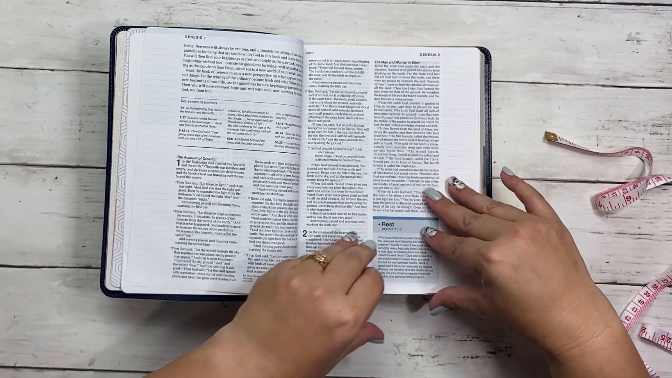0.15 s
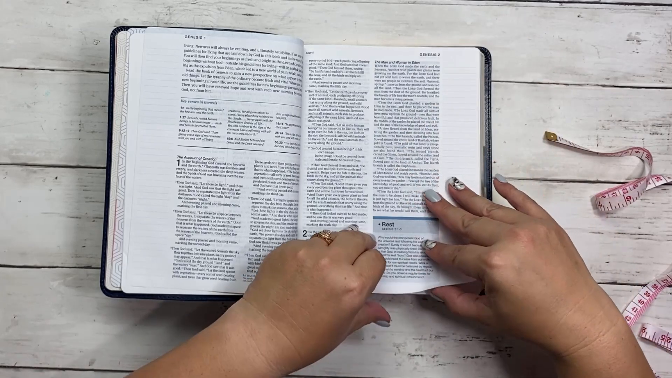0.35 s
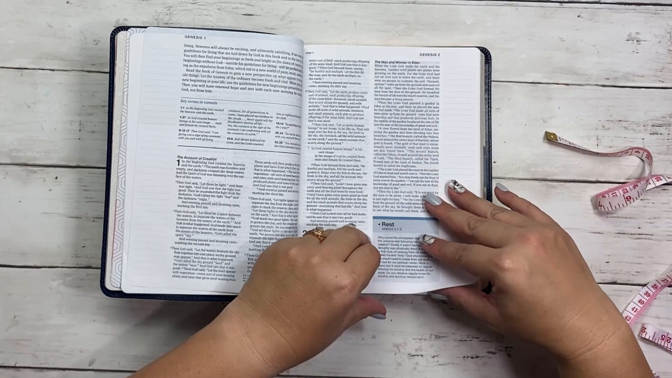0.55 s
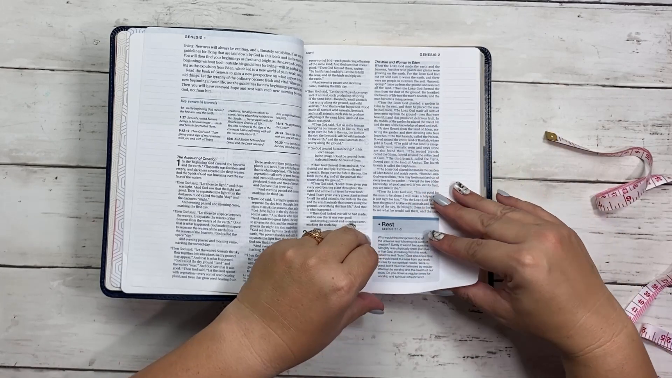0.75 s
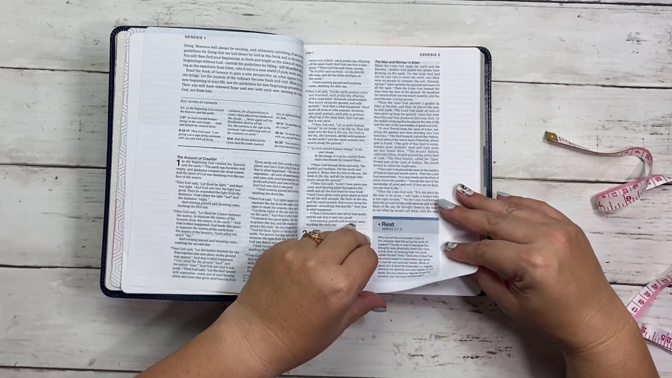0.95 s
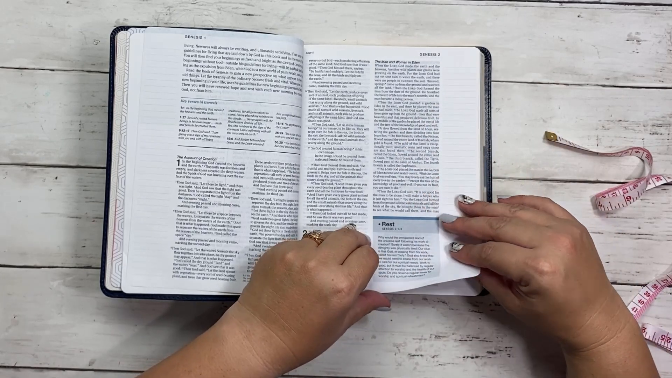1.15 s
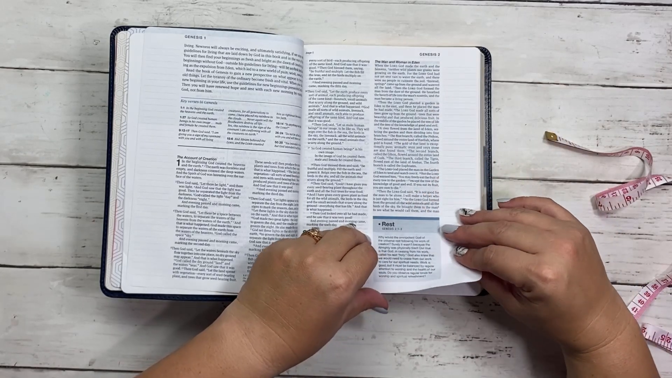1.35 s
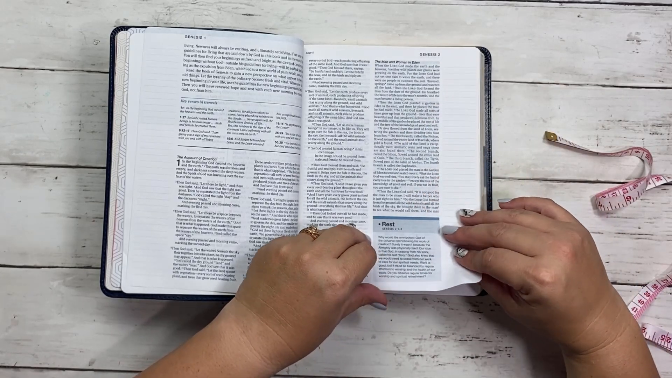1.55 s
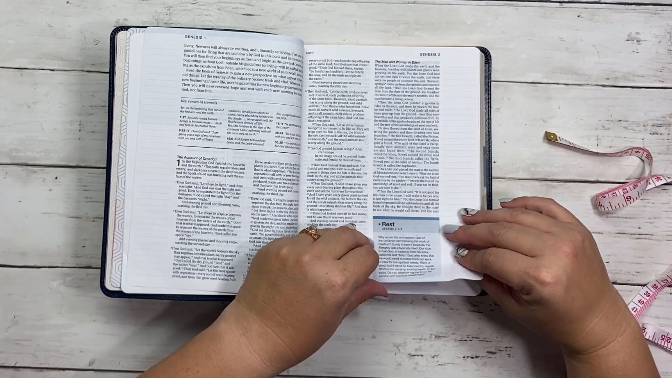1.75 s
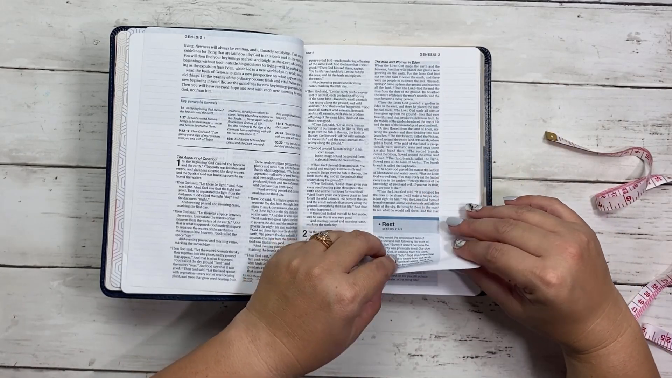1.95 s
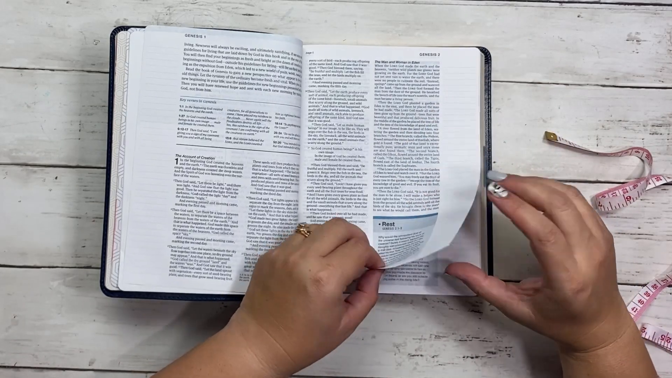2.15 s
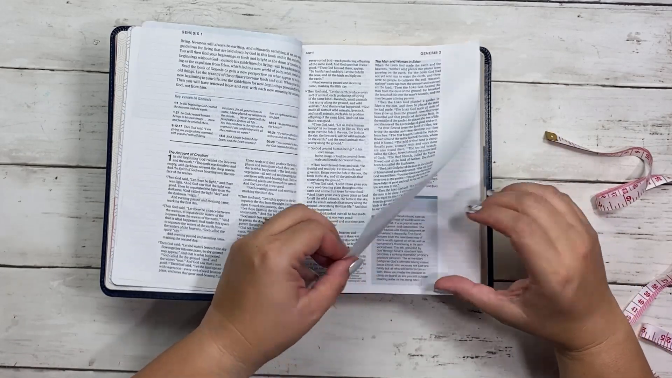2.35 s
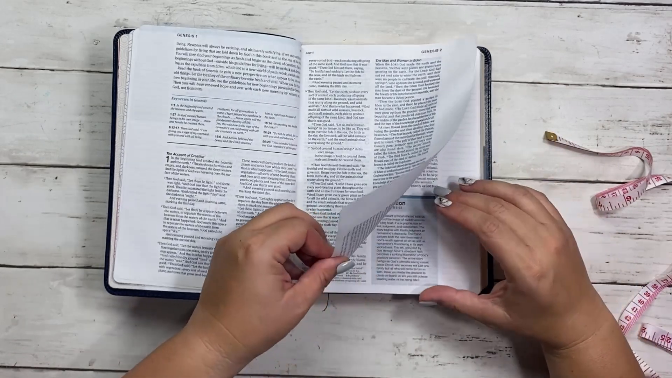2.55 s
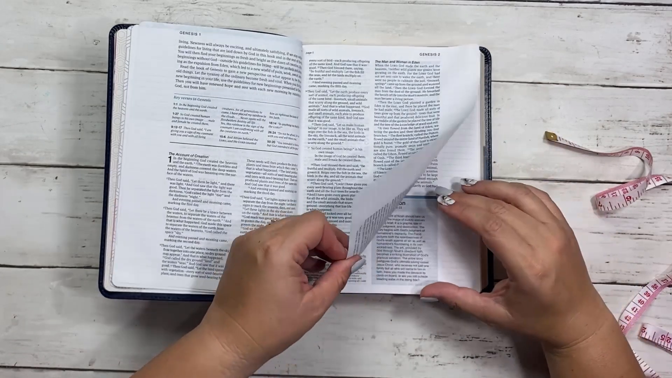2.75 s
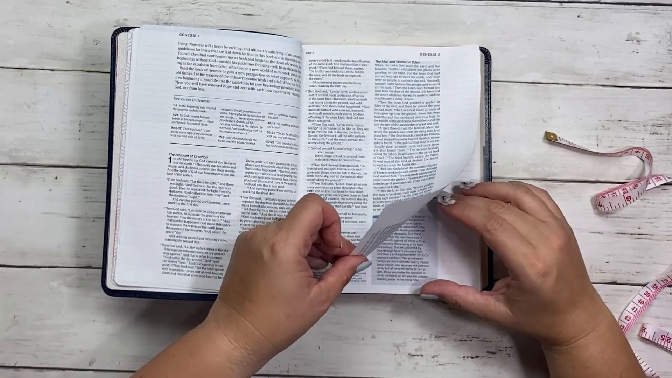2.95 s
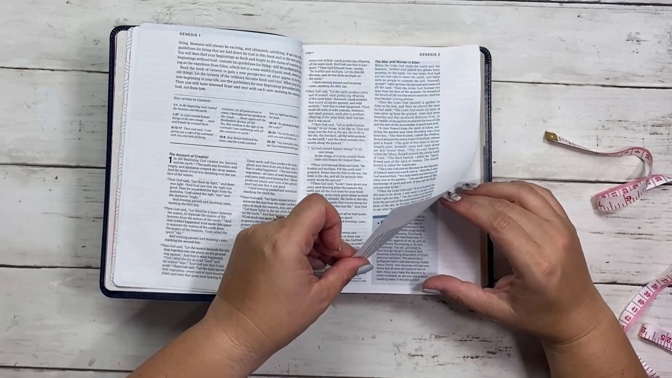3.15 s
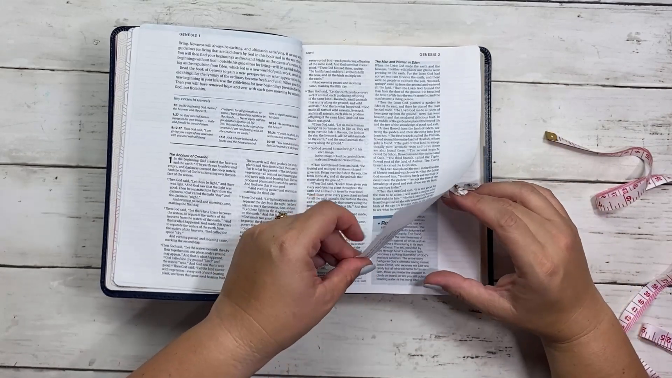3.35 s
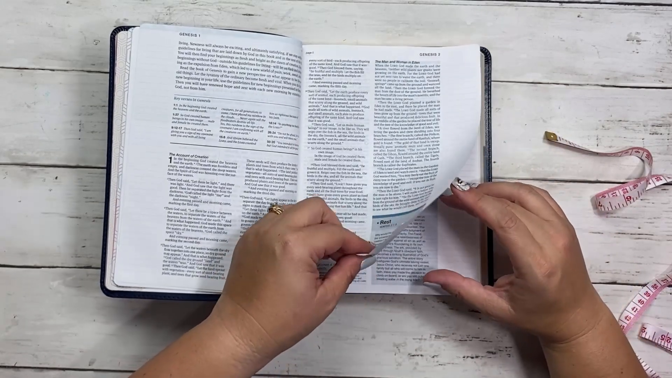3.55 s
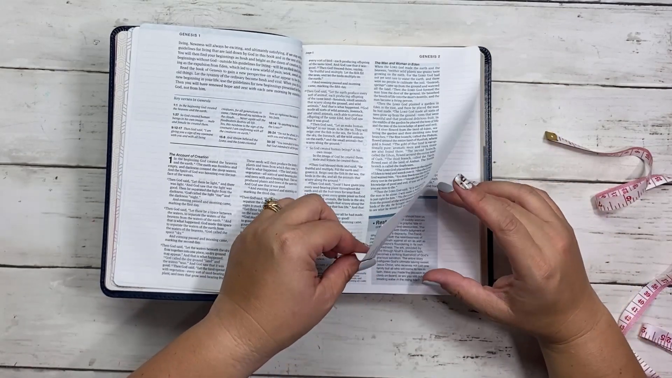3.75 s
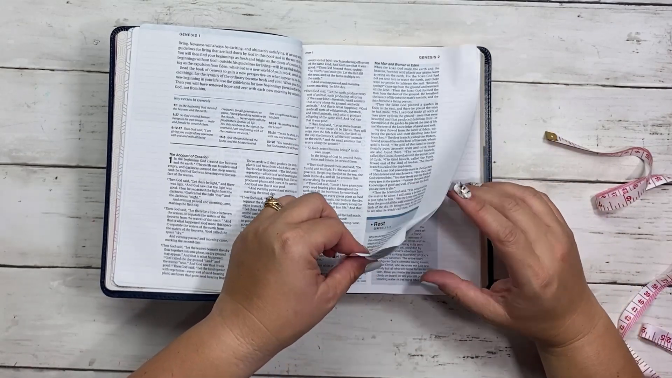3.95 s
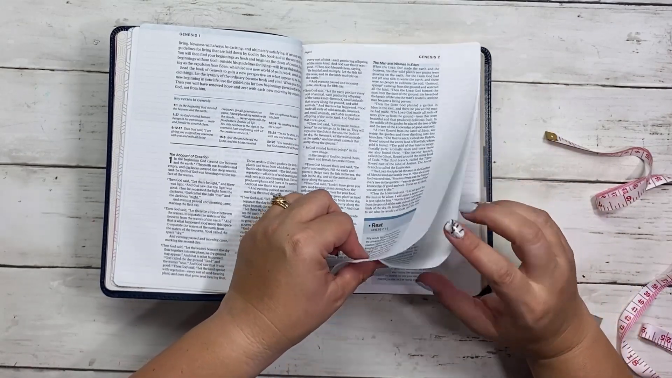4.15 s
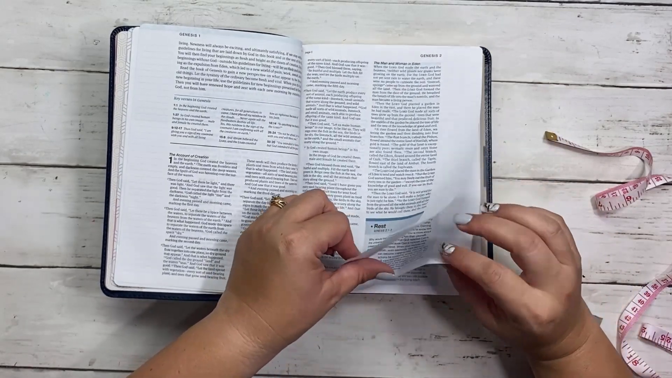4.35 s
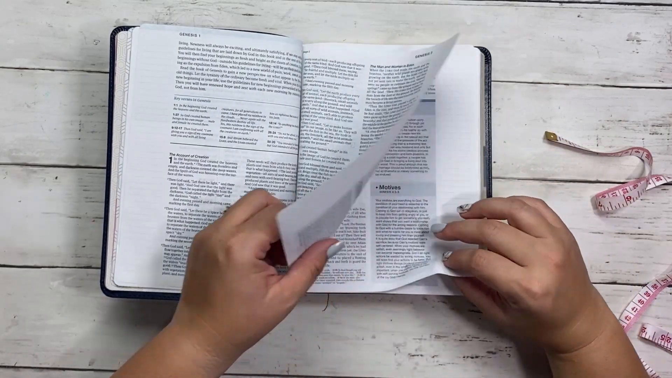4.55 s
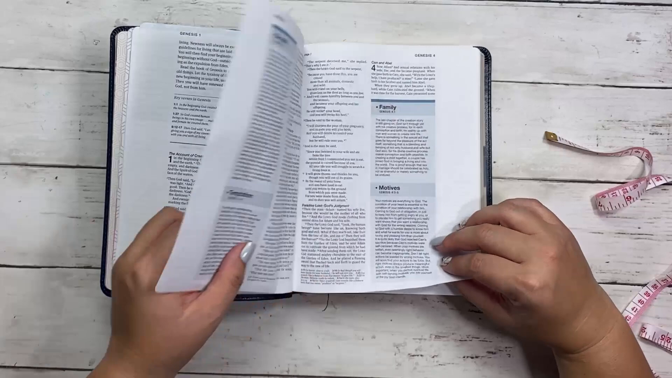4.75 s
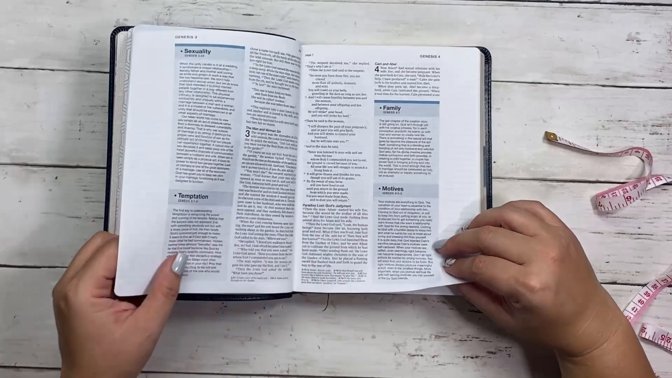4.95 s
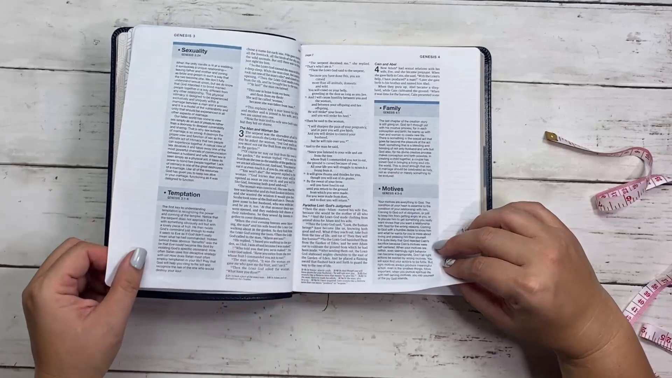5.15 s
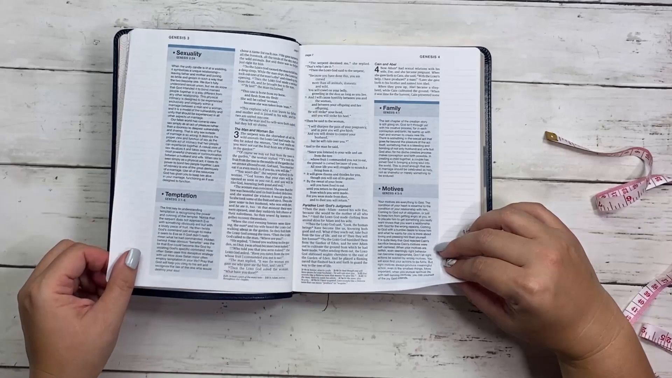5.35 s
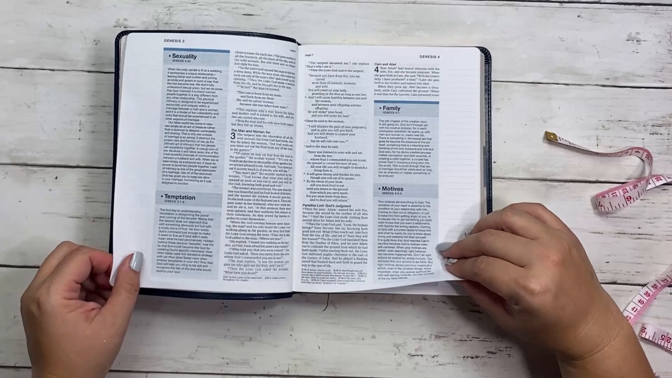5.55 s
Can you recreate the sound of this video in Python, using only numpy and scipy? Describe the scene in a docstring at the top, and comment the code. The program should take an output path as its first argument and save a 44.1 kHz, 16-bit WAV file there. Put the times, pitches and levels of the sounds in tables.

```python
"""Wooden table in a quiet room: hands smooth, lift and turn the thin pages of a book.
Fingers rub the paper (banded noise), the lifted sheet flutters (duller noise) and crinkles (short rings).
Creases snap or fingernails tap with a tick and a short pop, wrists bump the table (thuds falling in pitch);
something hard clinks once (decaying modes); a low rumble of the house lies below (noise near 60 Hz).
Two close microphone ports hear it."""
import sys
import numpy as np
from scipy import signal
from scipy.fft import rfft, irfft, next_fast_len
from scipy.io import wavfile
from scipy.ndimage import uniform_filter1d

SR = 44100
rng = np.random.default_rng(int(sys.argv[2]) if len(sys.argv) > 2 else 0)


def waveform_to_disk(signal):
    """Save audio, clipped to [-1, 1], as 16-bit WAV at the path in sys.argv[1]."""
    frames = np.transpose(np.atleast_2d(signal))
    scaled = np.clip(frames, -1, 1) * 32767
    samples = np.round(scaled).astype(np.int16)
    wavfile.write(sys.argv[1], SR, samples)


N = 250929

# rustles of hand-moved paper: peak_s, rise_s and fall_s (over 20 dB),
# rubbing_db, sizzle_db, flutter_db (of the lifted sheet)
RUSTLES = [(0.01, .05, .3, -73, -65, -73), (0.175, .04, .07, -66, -65, -72),
           (0.33, .02, .15, -60, -56, -79), (0.367, .05, .11, -50, -50, -57), (.44, .1, .04, -63, -61, -65),
           (0.529, .04, .26, -55.5, -66, -72), (.7, .4, .4, -78, -66, -90), (0.95, .25, .2, -62, -58, -76),
           (1.04, .2, .05, -56, -61, -75), (1.135, .035, .17, -51, -61, -66),
           (1.295, .14, .07, -48, -66, -67), (1.39, .04, .08, -56, -72, -58), (1.5, .1, .25, -72, -84, -72),
           (1.754, .15, .1, -74, -84, -78), (1.86, .02, .15, -76, -73, -74),
           (1.94, .08, .2, -57.5, -64, -57), (2.041, .04, .15, -56, -70, -53),
           (2.11, .03, .2, -49, -54, -60), (2.14, .03, .16, -45, -44, -48), (2.22, .15, .05, -60, -60, -52),
           (2.337, .04, .2, -54, -63, -49), (2.41, .1, .1, -62, -62, -49), (2.5, .15, .15, -56, -62, -53),
           (2.59, .2, .05, -56, -69, -64), (2.752, .025, .15, -54.5, -62, -45),
           (2.85, .09, .1, -46, -51, -50), (3.155, .015, .1, -56, -57, -50),
           (3.365, .03, .1, -62, -80, -85), (3.408, .03, .1, -45, -57, -48),
           (3.545, .02, .05, -36, -46, -43), (3.6, .06, .2, -46, -51, -49),
           (3.722, .04, .11, -43, -50, -49), (3.831, .04, .2, -47, -53, -47),
           (3.927, .07, .15, -39, -42, -48), (4.075, .02, .06, -40, -45, -52),
           (4.095, .03, .12, -36, -46, -48), (4.155, .08, .06, -39, -44, -50),
           (4.22, .06, .2, -43, -54, -54), (4.34, .1, .15, -44, -54, -56), (4.39, .1, .05, -40, -54, -57),
           (4.48, .1, .05, -50, -58, -62), (4.525, .015, .07, -46, -50, -55), (4.62, .2, .3, -56, -56, -65),
           (4.75, .1, .2, -54, -55, -55), (4.849, .1, .1, -39, -53, -50), (4.95, .3, .3, -62, -57, -64),
           (5.059, .06, .2, -47, -52, -65), (5.16, .25, .15, -48, -55, -72),
           (5.31, .5, .025, -49, -53, -74), (5.37, .1, .25, -71, -68, -85),
           (5.568, .02, .09, -58, -63, -54)]


def amp(db):
    """dB to gain."""
    return 10 ** (np.asarray(db) / 20)


def rms_one(x):
    """Scale to rms 1."""
    return x / np.sqrt(np.mean(x ** 2) + 1e-20)


def in_time(curve):
    """Read a (time in s, value) curve at every sample."""
    s, values = np.transpose(curve)
    return np.interp(np.arange(N) / SR, s, values)


def at_hz(points, hz):
    """Read a spectrum on a log frequency axis."""
    p = np.array(points)
    return np.interp(np.log(hz + 1), np.log(p[:, 0] + 1), p[:, 1])


def drift(corner_hz):
    """Slow random curve of spread 1: noise through two equal one-pole low-passes."""
    step = 40   # samples between drawn points
    r = np.exp(-2 * np.pi * corner_hz * step / SR)
    white = rng.standard_normal(N // step + 2002)
    slow = signal.lfilter([1], [1, -2 * r, r * r], white)[2000:]   # drop the run-in
    return np.interp(np.arange(N) / step, np.arange(len(slow)), rms_one(slow))


def coloured(x, spectrum):
    """Give white signals a spectrum; rms 1."""
    size = next_fast_len(N)
    gain = amp(at_hz(spectrum, np.fft.rfftfreq(size, 1 / SR)))
    return rms_one(irfft(rfft(x, size) * gain, size)[..., :N])


def wide_noise(spectrum):
    """Stereo noise whose two sides agree less or more by band; rms 1."""
    # left-right correlation: freq_hz, likeness (0 to 1)
    likeness = [(30, .85), (60, 1), (300, 0.3), (1400, 0.4), (5000, 0.47), (12000, 1)]
    size = next_fast_len(N)
    alike = np.clip(at_hz(likeness, np.fft.rfftfreq(size, 1 / SR)), 0, 1)
    mid, side = rfft(rng.standard_normal((2, size)))
    pair = irfft(np.sqrt(1 + alike) * mid + np.sqrt(1 - alike) * side * [[1], [-1]], size)
    return coloured(pair[:, :N], spectrum)


def ring(clicks, hz, cycles):
    """A click sets a sine of height 1 ringing that falls 60 dB in so many cycles."""
    r = amp(-60 * hz / (cycles * SR))
    w = 2 * np.pi * hz / SR
    return signal.lfilter([0, np.sin(w)], [1, -2 * r * np.cos(w), r * r], clicks + 1e-18)


def hush():
    """Steady faint noise of the quiet room."""
    # freq_hz, level_db (per Hz, relative)
    hush_spectrum = [(60, -21.5), (120, -0.5), (200, 2.5), (400, -4.5), (800, -10.5), (2000, -18),
                     (4500, -15.5), (8000, -29), (13000, -28), (16500, -35)]
    level_db = -70
    return amp(level_db) * wide_noise(hush_spectrum)


def house_rumble():
    """Low noise of the house, narrow around 60 Hz, at a drawn level."""
    # start_s, level_db
    level_curve = [(0.0, -62), (0.06, -56), (0.11, -67), (0.28, -51), (1.66, -62), (1.7, -52), (1.92, -60),
                   (2.84, -55), (3.1, -66), (3.15, -56), (3.31, -70), (3.49, -58), (3.6, -70), (3.66, -56),
                   (3.88, -50), (3.93, -66), (4.72, -63), (4.86, -53), (4.93, -64), (5.03, -58), (5.2, -66),
                   (5.24, -55), (5.33, -51), (5.36, -66), (5.67, -57), (5.69, -66)]
    # freq_hz, level_db (per Hz, relative)
    rumble_spectrum = [(15, -52), (30, -19.5), (45, -11.5), (59, 5.5), (72, -4.5), (110, -6.5), (160, -17),
                       (300, -53)]
    return amp(in_time(level_curve)) * wide_noise(rumble_spectrum)


def room(x):
    """Eight feedback delays a side, duller on every round."""
    bass_t60_s, wall_cut_hz, level_db = .3, 13000, -17
    out = np.zeros((2, N))
    dull = np.exp(-2 * np.pi * wall_cut_hz / SR)
    lags = (rng.uniform(.007, 0.027, 16) * SR).astype(int)
    for k, lag in enumerate(lags):
        loop, state = x.copy(), [0.]
        gain = amp(-60 * lag / SR / bass_t60_s)
        for i in range(lag, N, lag):
            back, state = signal.lfilter([gain * (1 - dull)], [1, -dull], loop[i - lag:i], zi=state)
            loop[i:i + lag] += back[:N - i]
        echoes = loop - x
        out[k % 2] += echoes * (-1) ** (k // 2)
    return amp(level_db) * out


def clink():
    """One light touch of something small and hard sets a few clear modes going."""
    # freq_hz, level_db (under the touch), t60_s
    clink_modes = [(1400, -20, .012), (2500, -2, .03), (2570, -7, .05), (4500, -10, .016),
                   (11230, -5, .025)]
    start_s, touch_db, touch_cut_hz = 1.8455, -44, 5000
    touch = np.zeros(N)
    touch[round(start_s * SR)] = amp(touch_db)
    touch = signal.lfilter(*signal.butter(1, touch_cut_hz, fs=SR), touch)
    return sum(amp(db) * ring(touch, hz, hz * t60_s) for hz, db, t60_s in clink_modes)


def bumps():
    """Soft flesh on wood: bending waves arrive high ones first, so the thud falls; the page block shuffles."""
    # wrists and fingertips on the table: start_s, level_db, first_hz, last_hz, t60_s
    table_bumps = [(.17, -58, 300, 150, .2), (0.374, -46.5, 497, 126, 0.22), (0.651, -42, 380, 170, 0.1),
                   (0.912, -40, 590, 95, 0.21), (0.949, -53, 706, 300, .03), (1.373, -38, 500, 184, 0.09),
                   (1.536, -47, 464, 198, 0.034), (2.47, -52, 350, 190, .2), (2.8, -50, 350, 180, .2),
                   (5.186, -61, 610, 400, 0.089)]
    shuffle_spectrum = [(60, -30), (130, 4), (400, -0.5), (700, -16.5), (2000, -55)]   # Hz, dB per Hz
    glide_s, attack_s, shuffle_db, shuffle_t60_s = 0.00413, .0026, -13, 0.24
    out, t = np.zeros(N), np.arange(N) / SR
    shuffle = coloured(rng.standard_normal(N), shuffle_spectrum)
    for start_s, level_db, first_hz, last_hz, t60_s in table_bumps:
        age = np.clip(t - start_s, 0, None)
        hz = last_hz + (first_hz - last_hz) * np.exp(-age / glide_s)
        phase = 2 * np.pi * np.cumsum(hz * (age > 0)) / SR
        thud = amp(-60 * age / t60_s) * np.sin(phase)
        pages = amp(shuffle_db - 60 * age / shuffle_t60_s) * shuffle
        out += amp(level_db) * (1 - np.exp(-age / attack_s)) * (thud + pages)
    return out


def sheet_ring(x):
    """Whatever shakes the lifted sheet rings on faintly and briefly in its modes."""
    # freq_hz, level_db (relative, before the hz / SR factor), t60_s
    sheet_modes = [(790, -22, .05), (915, -18, .06), (1082, -18, .06), (1380, -24, .04), (1670, -24, .03),
                   (2150, -20, .04), (4600, -24, .02)]
    return sum(amp(db) * hz / SR * ring(x, hz, hz * t60_s) for hz, db, t60_s in sheet_modes)


def snaps_and_taps():
    """A crease snaps or a fingernail taps: treble tick first, then a short pop; one tick rings long."""
    # start_s, pop_hz, pop_db, tick_hz, tick_db, tick_ring_cycles, sizzle_db
    ticks_and_pops = [(0.364, 1040, -53, 2420, -46, 5.5, -35), (0.5146, 1360, -61, 5840, -50.5, 3.8, -45),
                      (1.334, 597, -51, 4400, -42, 15, -64), (1.3564, 620, -55, 3560, -47, 15, -58),
                      (1.3623, 860, -55, 4400, -43, 14, -61), (1.3719, 570, -42, 1450, -51, 150, -64),
                      (1.3998, 765, -50, 4010, -42, 15, -59), (1.4049, 690, -49, 3880, -44, 9.3, -62),
                      (1.4086, 595, -48, 3920, -47, 9.3, -60), (1.4826, 980, -56, 3900, -48.5, 15, -71),
                      (1.5332, 1730, -69, 3210, -47, 7, -76), (1.7355, 950, -67, 3810, -56.5, 15, -79),
                      (1.8918, 670, -50, 4570, -60, 7.4, -69), (1.9119, 775, -44.5, 2150, -50, 4.4, -62),
                      (1.9334, 970, -40, 4530, -43, 15, -70), (1.9642, 660, -42, 3260, -47.5, 6.3, -55),
                      (2.0245, 830, -37, 2760, -53, 5, -73), (2.0334, 740, -24, 5550, -34.5, 5.9, -75),
                      (2.1286, 925, -19.5, 6440, -14.5, 2.6, -66),
                      (2.1318, 890, -35, 6780, -54.5, 5, -24.5), (2.235, 860, -40.5, 6270, -49, 5, -48),
                      (2.3292, 854, -41.5, 2390, -39.5, 3.5, -66), (2.4424, 820, -35, 6680, -47, 6.1, -61),
                      (2.4564, 930, -36, 6930, -68, 5, -64), (2.4614, 1030, -29.5, 6340, -45, 6.8, -47),
                      (2.4935, 1040, -19, 2270, -38.5, 1.7, -46),
                      (2.5276, 1680, -51, 4090, -39.5, 6.7, -55), (2.578, 1020, -28.5, 1860, -39.5, 8, -62),
                      (2.7382, 886, -14.5, 2200, -35, 4.2, -55), (2.77, 1000, -16, 2180, -36.5, 2.3, -31),
                      (2.8156, 1100, -21, 2160, -37, 4.3, -54), (2.823, 1460, -30, 6660, -28.5, 8.8, -28.5),
                      (2.868, 1160, -26, 1920, -36, 3.8, -49), (2.8753, 1780, -30, 1840, -30, 6, -48.5),
                      (3.1434, 930, -22, 2450, -34, 5.2, -48), (3.3848, 1180, -41, 4670, -37, 4.1, -44),
                      (3.4106, 925, -22.5, 2100, -29.5, 4.5, -36), (3.45, 830, -34, 4100, -40, 3.4, -57),
                      (3.4854, 780, -40, 2390, -45, 5, -57), (3.5052, 1070, -30, 1900, -38, 4.4, -52),
                      (3.519, 1500, -36, 2200, -38, 5, -55), (3.5345, 2000, -30, 3500, -24, 2, -30),
                      (3.5385, 2150, -28, 6560, -22, 2, -29), (3.5525, 1110, -28.5, 2760, -24, 1.7, -35),
                      (3.5575, 1010, -25, 2060, -27, 5, -56), (3.6294, 1020, -31, 2560, -38, 4.5, -46),
                      (3.647, 1100, -48, 4000, -40, 4, -42), (3.6576, 1050, -44, 2750, -36, 3.1, -36),
                      (3.696, 1200, -52, 4500, -43, 2, -45), (3.7058, 1080, -32, 6700, -28.5, 7.4, -41),
                      (3.712, 1000, -32, 4500, -40, 4, -50), (3.716, 1460, -33, 1950, -25, 2.5, -23),
                      (3.7252, 980, -27.5, 3060, -30, 3.3, -43), (3.738, 1100, -42, 6000, -32, 3, -38),
                      (3.76, 1800, -45, 2500, -38, 5, -55), (3.77, 1790, -54, 2970, -33.5, 2.6, -43),
                      (3.782, 1700, -48, 3040, -36, 3.5, -31), (3.8185, 1170, -25, 3900, -23, 4.4, -36),
                      (3.8385, 1010, -28.5, 1940, -30, 9.7, -47), (3.8928, 1160, -44, 4600, -31, 15, -43),
                      (3.909, 1800, -42, 2500, -35, 4, -50), (3.914, 950, -26, 4100, -24.5, 2.7, -21),
                      (3.9327, 1120, -48, 2940, -30, 4.1, -32), (3.9728, 1440, -39, 6600, -28.5, 3.3, -31),
                      (4.0088, 1770, -47, 2280, -35, 3.4, -29), (4.0405, 1250, -62, 2590, -37, 6.4, -30),
                      (4.0476, 780, -63, 3040, -33.5, 5.5, -27),
                      (4.0703, 1750, -38, 3680, -27.5, 4.2, -19.5), (4.077, 1800, -46, 2730, -29, 6, -38),
                      (4.094, 1000, -40, 2500, -33, 5, -38), (4.137, 1500, -48, 7000, -31, 6, -36),
                      (4.1418, 1770, -55, 2150, -28, 8.9, -27), (4.199, 1500, -50, 3500, -36, 3, -45),
                      (4.2078, 1100, -38, 2400, -30, 5, -46), (4.2654, 860, -35, 2130, -36, 2.9, -50),
                      (4.3048, 1200, -38, 1950, -36, 3.1, -54), (4.3329, 1820, -45, 4180, -32, 3.1, -53),
                      (4.3719, 790, -40.5, 2830, -32.5, 5, -31), (4.449, 1790, -47, 4900, -43, 5, -54),
                      (4.5027, 1860, -43, 2250, -36, 3.3, -36), (4.5155, 1490, -27, 2900, -25, 7, -18),
                      (4.525, 1200, -40, 3500, -35, 3, -35), (4.586, 1800, -55, 2700, -44, 8, -65),
                      (4.639, 1500, -50, 2800, -45, 4, -65), (4.7216, 1180, -44, 2130, -42, 4.5, -56),
                      (4.7354, 590, -59, 6420, -41, 4, -47), (4.7546, 1100, -42, 2370, -49, 5, -53),
                      (4.7856, 855, -46, 5240, -31.5, 4.2, -38), (4.7913, 990, -39, 2770, -50, 5, -50),
                      (5.05, 1100, -50, 2600, -44, 5, -55), (5.1895, 1540, -44, 2850, -40.5, 11, -54),
                      (5.3529, 1490, -58, 2270, -44.5, 2.1, -46), (5.5555, 963, -39, 4530, -37.5, 3.1, -40),
                      (5.589, 970, -57, 5300, -48.5, 8.5, -64)]
    pan_mean_db, pan_spread_db = 0.2, 1.5   # left over right
    tick_foot = .55   # a tick has little below this share of its pitch
    length = 2000   # samples
    out, t = np.zeros((2, N + length)), np.arange(length) / SR
    chance = rng.standard_normal((len(ticks_and_pops), 3, length))
    high = signal.butter(4, 7000, "high", fs=SR, output="sos")
    swell = (t / .0016) ** 2 * np.exp(-2 * t / 0.00089)
    tail = np.exp(-t / 0.0013) + amp(-18) * np.exp(-t / 0.0071)
    burst = np.minimum(t / 0.00072, 1) ** 2 * tail
    for row, noise in zip(ticks_and_pops, chance):
        start_s, pop_hz, pop_db, tick_hz, tick_db, cycles, sizzle_db = row
        pop = swell * np.sin(2 * np.pi * pop_hz * t) / swell.max()
        flap = ring(noise[0] * np.exp(-t / 0.01), pop_hz, 1.43) * amp(-14.5)
        tick = ring(np.diff(noise[1], prepend=0) * burst, tick_hz, max(cycles, 1))
        tick = signal.lfilter(*signal.butter(1, tick_foot * tick_hz, "high", fs=SR), tick)
        tick = tick / np.sqrt(uniform_filter1d(tick ** 2, size=53).max())   # loudest 1.2 ms to rms 1
        sizzle = rms_one(signal.sosfilt(high, noise[2])) * burst
        event = amp(pop_db) * (pop + flap) + amp(tick_db) * tick + amp(sizzle_db) * sizzle
        at = round(start_s * SR)
        pan_db = pan_mean_db + pan_spread_db * noise[0, -1]
        out[:, at:at + length] += event * amp([[pan_db / 2], [-pan_db / 2]])
    # so small a source moves too little air to make bass
    return signal.sosfilt(signal.butter(2, 520, "high", fs=SR, output="sos"), out[:, :N])


def crinkles(per_s, spread_db, cycles):
    """Tiny creases flip at random, in clumps, each ringing a few cycles at one of 14 pitches."""
    sizes = amp(spread_db * np.minimum(rng.exponential(1, N), 4)) * rng.choice([-1, 1], N)
    born = rng.random(N) < per_s * amp(5.0 * drift(15)) / SR
    pitches_hz, dealt = np.geomspace(1200, 13000, 14), rng.integers(0, 14, N)
    return sum(ring(sizes * born * (dealt == k), hz, cycles) for k, hz in enumerate(pitches_hz))


def swish(centre_hz):
    """Friction noise in third-octave bands, loudest near the moving centre; rms about 1."""
    below_db, above_db = 40, 5   # fall per octave under and over the centre
    flicker_db = 2.2   # of each band
    out, power = 0, 0
    edges_hz = 800 * 2 ** (np.arange(12) / 3)
    white = [wide_noise([(20, 0), (20000, 0)]) for _ in range(2)]   # neighbouring bands take turns
    for k, (low, high) in enumerate(zip(edges_hz, edges_hz[1:])):
        octaves = np.log2(np.sqrt(low * high) / centre_hz)
        slope_db = np.where(octaves < 0, below_db, -above_db) * octaves
        gain = amp(slope_db + flicker_db * drift(11)) * np.sqrt(high - low)
        band = signal.butter(3, [low, high], "band", fs=SR, output="sos")
        out = out + gain * rms_one(signal.sosfilt(band, white[k % 2]))
        power = power + gain ** 2
    return out / np.sqrt(uniform_filter1d(power, size=4000))


def rustling(levels_db):
    """Each rustle climbs to its peak and dies away evenly in dB; their powers add."""
    t = np.arange(0, N + 64, 64) / SR
    peak_s, rise_s, fall_s = np.transpose(RUSTLES)[:3, :, None]
    shape_db = -20 * np.where(t < peak_s, (peak_s - t) / rise_s, (t - peak_s) / fall_s)
    power = np.sum(amp(levels_db[:, None] + shape_db) ** 2, axis=0)
    return np.interp(np.arange(N) / SR, t, 10 * np.log10(power + 1e-12))


def handling():
    """Swish, sizzle, the duller flutter of the sheet and its crinkles follow the hands."""
    # swish centre, higher for a fingertip on flat paper: start_s, centre_hz
    swish_centre = [(0, 2000), (.37, 2200), (.52, 3800), (.75, 4900), (.95, 3950), (1.35, 3400),
                    (1.6, 2500), (2.15, 2400), (2.3, 2000), (3.55, 1900), (3.93, 2280), (4.6, 2350),
                    (4.85, 1950), (5.05, 2380), (5.32, 2700), (5.45, 2000), (5.69, 2200)]
    # freq_hz, level_db (per Hz, relative)
    sizzle_spectrum = [(4000, -33), (6000, -3.5), (7500, 2), (11000, -0.5), (15000, -0.5), (16000, -20)]
    # freq_hz, level_db (per Hz, relative)
    flutter_spectrum = [(150, -55), (250, -19), (433, -19), (520, -10), (772, -5.5), (1470, -3),
                        (2500, -12.5), (3250, -70), (5500, -120)]
    crinkle_db = -3   # against the hands' level
    rub_db, sizzle_db, flutter_db = [rustling(levels_db) for levels_db in np.transpose(RUSTLES)[3:]]
    grain = amp(2.2 * drift(73))   # skin grips the fibres unevenly
    rub = amp(rub_db) * swish(in_time(swish_centre))
    sizzle = amp(sizzle_db) * wide_noise(sizzle_spectrum)
    flutter = wide_noise(flutter_spectrum) * amp(flutter_db + 2.03 * drift(29.6))
    lifted_db = np.minimum(rub_db, flutter_db + 8.0)   # paper pressed flat does not crinkle
    creases = amp(lifted_db + crinkle_db) * crinkles(per_s=160, spread_db=6.0, cycles=9.0)
    return grain * (rub + sizzle) + flutter, creases


def scene():
    """Paper, table and house together."""
    hiss, creases = handling()
    near = snaps_and_taps() + creases
    near = near + sheet_ring(near + hiss) + clink()
    echoes = room(near.mean(axis=0))
    return hush() + house_rumble() + echoes + bumps() + near + hiss


def record(dry):
    """The two ports differ in level; in the treble the two sides also drift apart in phase; the top is cut."""
    # freq_hz, left_lead_rad
    treble_phase = [(0, 0), (6900, 0), (17000, -15.1)]
    # freq_hz, left_over_right_db
    port_balance = [(60, 1.3), (5000, 1.7), (9000, 0)]
    cutoff_hz = 17100
    size = next_fast_len(N + 4096)
    hz = np.fft.rfftfreq(size, 1 / SR)
    lead_rad = np.interp(hz, *np.transpose(treble_phase))
    left = amp(at_hz(port_balance, hz) / 2) * np.exp(.5j * lead_rad)   # half the difference a side
    ports = irfft(rfft(dry, size) * [left, 1 / left], size)[:, :N]
    return signal.sosfilt(signal.cheby2(12, 70, cutoff_hz, fs=SR, output="sos"), ports)


dry = scene()
out = record(dry)
waveform_to_disk(out)
```